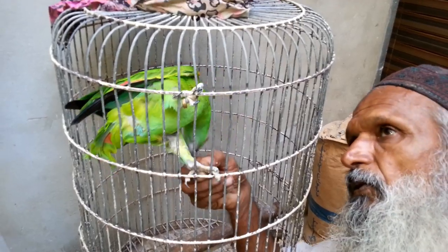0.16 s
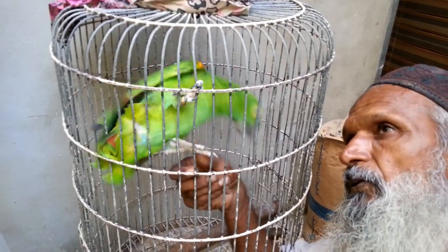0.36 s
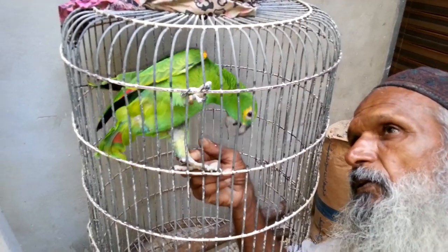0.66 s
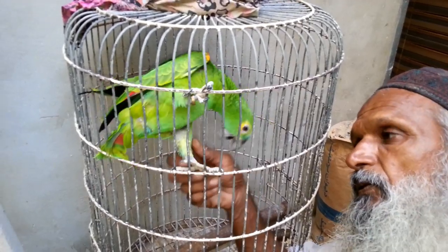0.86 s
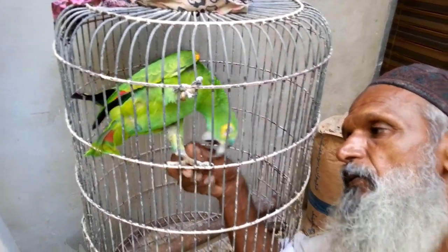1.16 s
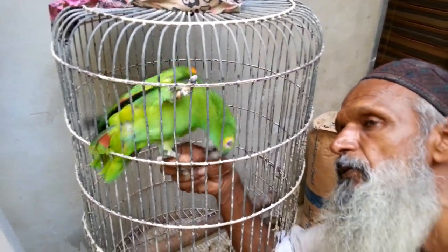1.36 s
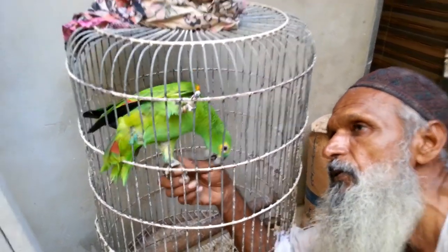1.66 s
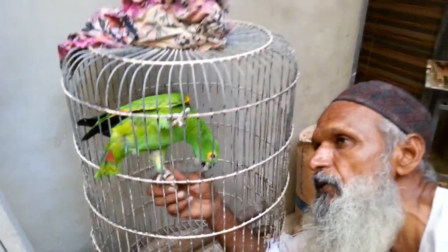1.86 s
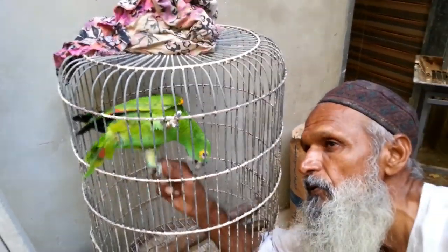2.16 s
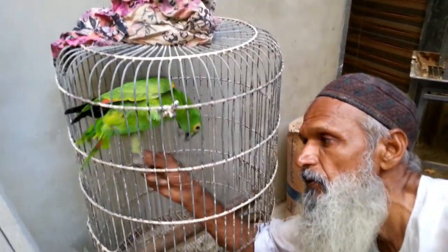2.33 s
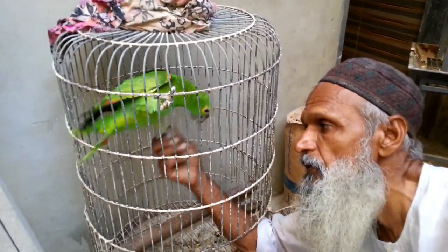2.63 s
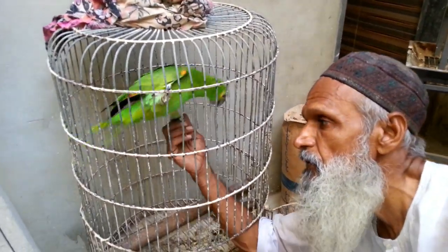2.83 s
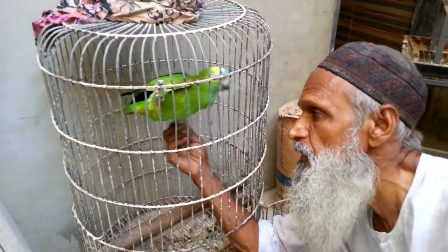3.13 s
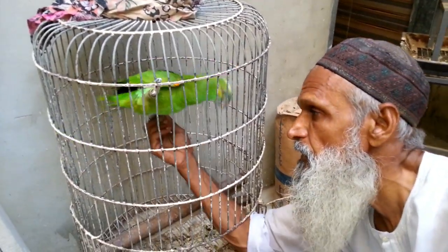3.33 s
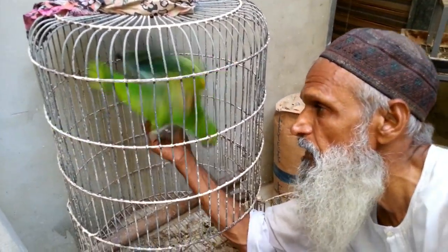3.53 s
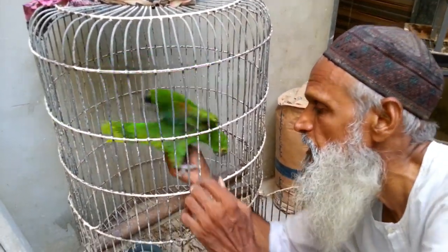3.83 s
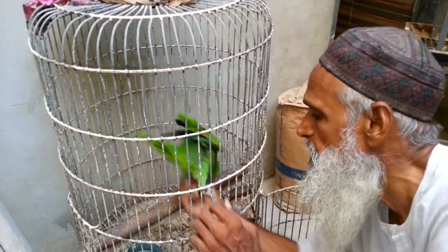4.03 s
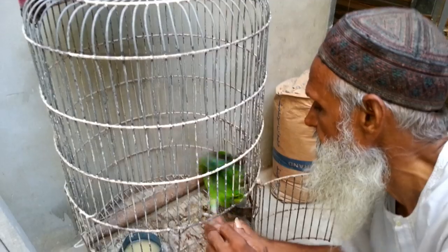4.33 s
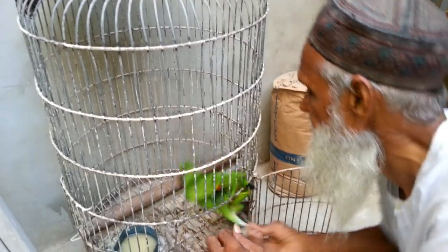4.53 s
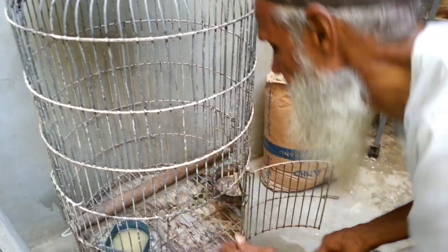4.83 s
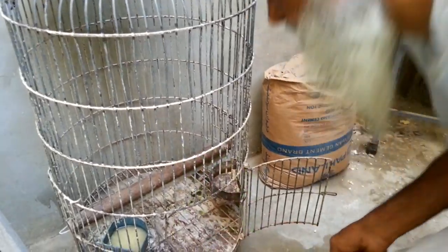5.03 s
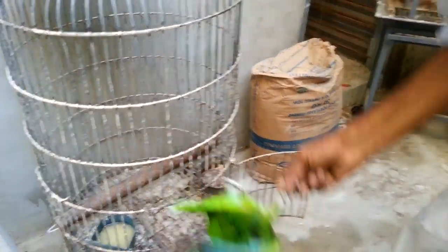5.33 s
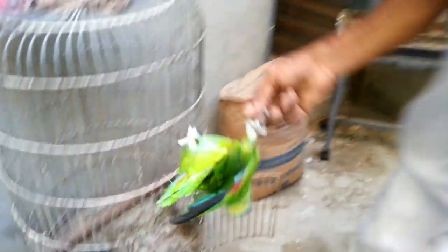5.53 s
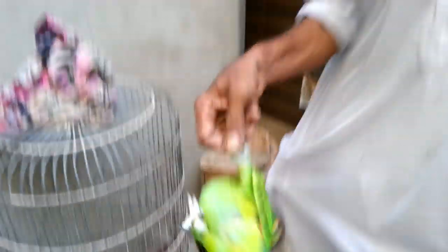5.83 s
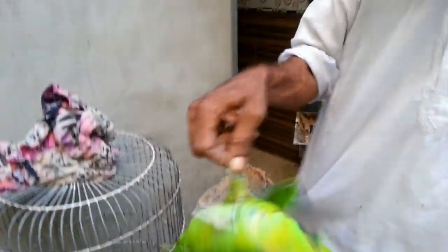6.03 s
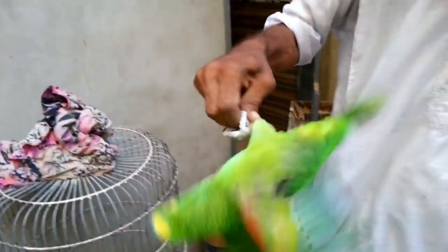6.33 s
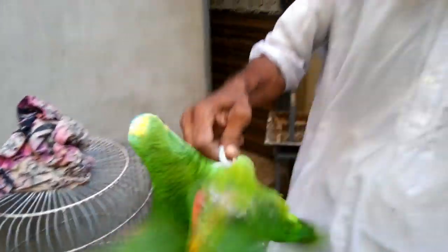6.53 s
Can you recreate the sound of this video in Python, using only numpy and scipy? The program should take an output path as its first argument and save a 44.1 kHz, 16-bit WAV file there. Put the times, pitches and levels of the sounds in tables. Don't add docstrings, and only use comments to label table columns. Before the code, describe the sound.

A parrot's feathers rustle and snap in quick wing bursts, with faint squeaks in a hard-walled yard, then one loud harsh squawk overloads the microphone.

```python
import sys
import numpy as np
from scipy import signal
from scipy.fft import rfft, irfft, next_fast_len
from scipy.io import wavfile
from scipy.ndimage import uniform_filter1d, minimum_filter1d

SR = 44100
rng = np.random.default_rng(int(sys.argv[2]) if len(sys.argv) > 2 else 0)


def to_linear_factor(level_db):
    exponent = np.asarray(level_db, float) / 20
    return 10 ** exponent


def persist_wave(psi):
    counts = np.round(np.clip(psi, -1, 1) * 32767).astype(np.int16)
    wavfile.write(sys.argv[1], SR, np.atleast_2d(counts).T)


N = 294588
CLOCK = np.arange(0, N / SR + .001, .0005)


def level(x, db):
    return x * to_linear_factor(db) / np.sqrt(np.mean(x ** 2))


def colour(x, points):
    size = next_fast_len(len(x))
    hz, db = np.transpose(points)
    log_hz = np.log(np.arange(size // 2 + 1) * SR / size + 1)
    gain = to_linear_factor(np.interp(log_hz, np.log(hz), db))
    return irfft(rfft(x, size) * gain, size)[:len(x)]


def walk(rate, size=8192):
    hold = max(int(SR / rate), 2)
    steps = np.repeat(rng.standard_normal(size // hold + 1), hold)
    return 1.167 * uniform_filter1d(uniform_filter1d(steps, hold), hold)[:size]


def band(x, hz, octaves):
    edges = np.clip(hz * 2 ** (np.array([-octaves, octaves]) / 2), 10, .45 * SR)
    return signal.sosfilt(signal.butter(2, edges, "band", fs=SR, output="sos"), x)


def add(out, s, x):
    i = int(s * SR)
    out[i:i + len(x)] += x[:N - i]


def yard_tone():
    # pitch_hz, level_db
    yard_colour = [(15, -47), (25, -8), (55, -16), (151, -32), (221, -8), (330, -17), (581, -2.5),
                   (720, -16), (802, -6.5), (917, -16), (15400, -20.5)]
    return level(colour(rng.standard_normal(N), yard_colour), -63.5)


def surge(s, db, rise, fall, hold=0., jump_db=0.):
    before = np.maximum((s - CLOCK) / max(rise, .004), 0)
    after = np.maximum((CLOCK - s - hold) / max(fall, .04), 0)
    jump = jump_db * np.clip((s - CLOCK) / .003, 0, 1)
    return to_linear_factor(2 * (db - 30 * (before + after) - jump))


def smooth_db(power):
    return np.interp(np.arange(N) / SR, CLOCK, 10 * np.log10(power))


def motion():
    # start_s, hiss_db, fall_s per 30 dB, scrape_db re hiss, wing_body_weight_db
    shakes = [(.031, -51.5, -0.28, 5.5, 3), (.156, -70, 4, -5, 2.5), (0.405, -33.5, 0.1241, 1.5, -6),
              (0.51, -39.5, 0.1, 0.5, -8.5), (.881, -61, -0.1, 9, -5), (1.338, -42.5, 0.1255, 6, 8.5),
              (1.876, -44, 0.24, -8, -8), (1.958, -47.5, .5, -9.5, -4.5), (2.174, -38.5, 0.1, -11, -4.5),
              (2.655, -54.5, 1.1, 0, 2), (1.864, -52, 0.5, 1, -5), (2.163, -51, 0.28, -1.5, 2),
              (3.208, -57, 0.07, 7, 6), (4.106, -50, 1, -7, -3), (4.936, -51, 0.6, -3.5, 0),
              (5.255, -50, -0.1, -1, -3), (5.534, -59, 0.3, -10, -4), (6.114, -55.5, 8.2, -8.5, -5),
              (3.23, -44, 0.17, 8, 7), (3.742, -32.5, 0.11, -19, -1), (4.119, -32.5, 0.69, -7.5, 2.5),
              (4.481, -41, 0.4, 4, 4.5), (4.693, -23.5, 0.19, -11, -1.5), (4.95, -35.5, 0.15, -26.5, -8),
              (5.268, -43, 0.02, -7, -1.5), (5.316, -46, -0.08, -18, -7), (5.35, -47.5, -0.43, -12, -5.5),
              (5.54, -47, 0.14, -8, -8), (5.788, -59, 0, 0, -3), (6.024, -49.5, 0.3, -11, -10)]
    # peak_s, hiss_db, rise_s per 30 dB, fall_s per 30 dB, scrape_db re hiss
    sweeps = [(0.271, -37.5, 0.18, 0.36, 4), (1.179, -33.5, 0.1, 0.165, 3.5), (1.41, -51, 0.5, -0.01, 9.5),
              (1.6, -63.5, 3, 0.5, 4), (2.76, -54, 0.26, 0.25, 5.5), (1.757, -56, 0.3, 0.2, 2),
              (2.06, -41, 0.29, 0.06, -2), (2.482, -50, 0.08, 0, -2), (2.56, -60.5, .5, 0, 0),
              (2.985, -58, 0, 0, -5), (3.071, -53.5, 0.06, 0.13, 5.5), (3.308, -46.5, 0.14, 0.13, 0),
              (3.546, -56, 0.25, 0.3, -1), (3.613, -27, 0.0756, 0.2, -9.5), (3.798, -37.5, 0.12, 0.08, -11),
              (4.31, -39.5, 0.1, 0.22, 2.5), (4.589, -31, 0.23, 0.31, -1.5), (5.075, -45, -0.5, 0.1, -9),
              (5.14, -38, 0.1, 0.15, -18), (5.897, -55, 0.32, 0.1, 0.5), (6.066, -50.5, 0.04, 0, -8),
              (6.148, -50, 0.04, 1.8, -12), (6.459, -26, 0.27, 0.18, -7), (6.602, -27, 0.02, 0.04, -21),
              (6.671, -28, 0.02, -2, -10)]
    moves = []
    for s, db, fall, scrape_db, weight_db in shakes:
        moves.append((surge(s, db, rise=0.02, fall=fall, hold=0.011, jump_db=7), scrape_db, weight_db))
    for *row, scrape_db in sweeps:
        moves.append((surge(*row), scrape_db, 0.27 * scrape_db))
    hiss = scraped = body = to_linear_factor(2 * -81)
    for power, scrape_db, weight_db in moves:
        hiss = hiss + power
        scraped = scraped + power * to_linear_factor(2 * scrape_db)
        body = body + power * to_linear_factor(2 * weight_db)
    return smooth_db(hiss), smooth_db(scraped / hiss), smooth_db(body / hiss)


def barbs(points, rate, spread_db, octaves=.5):
    out = 0
    bands = 35 * 2 ** np.arange(0, 9.5, octaves)
    inside = (bands > points[0][0] / 1.3) & (bands < points[-1][0] * 1.3)
    for hz in bands[inside]:
        flicker = to_linear_factor(spread_db * walk(min(rate, hz / 4), size=N))
        out = out + band(rng.standard_normal(N), hz, octaves) * flicker
    return level(colour(out, points), 0)


def draught(hiss_db):
    # time_s, level_db
    breeze = [(0.0, -51.5), (0.2, -54), (1.06, -63.5), (1.1, -51), (1.67, -65.5), (1.99, -53), (2.1, -65),
              (4.78, -58.5), (4.84, -65), (5.97, -67), (6.06, -56), (6.13, -60), (6.22, -57), (6.47, -37),
              (6.53, -44.5), (6.57, -32), (6.62, -57), (6.68, -26)]
    # peak_s, level_db, rise_s per 30 dB, fall_s per 30 dB
    gusts = [(.2, -45.5, 0.5, 2), (.5, -48, 1, -1), (.71, -44.5, -0.95, -0.5), (.94, -50, -0.2, 0.4),
             (1.085, -50, -0.1, 0.4), (1.2, -47, 0.16, 0.34), (1.42, -47.5, 0.5, 0.23),
             (1.71, -52.5, 0.5, 0), (1.84, -45.5, 0, 0.26), (2.03, -49, 0.96, 0), (2.29, -52, 0.15, -0.4),
             (2.37, -55.5, 0.5, 2.5), (2.67, -52, 0.2, 2), (3.26, -47.5, 0.13, 0.16),
             (3.48, -50.5, 0.3, .5), (3.64, -48, 0.2, 0.5), (3.98, -45.5, -1.6, -0.27),
             (4.14, -44, -0.23, 0.53), (4.2, -40, 0.04, -0.16), (4.75, -46, 1.26, 0.3),
             (5.269, -48.5, -0.16, .3), (5.2, -55.5, 1.5, 0.6), (5.85, -54.5, 1.46, 0.3),
             (6.244, -38.5, 0.15, 0.1), (6.454, -34.5, 0.06, -0.3), (6.68, -36, 0.71, .3)]
    # pitch_hz, level_db
    air_colour = [(40, -25), (70, -8.5), (110, -2), (150, -5), (300, -3.5), (500, -10.5), (800, -18),
                  (1500, -20.5)]
    # pitch_hz, level_db
    buffet_colour = [(10, -38), (25, -13), (50, -9), (80, -2.5), (130, -19.5), (300, -38)]
    # start_s, peak_db, pitch_hz
    thumps = [(.077, -32, 270), (0.084, -30, 260), (.092, -29.5, 250), (0.162, -38.5, 113),
              (.497, -32, 370), (.69, -40, 210), (1.076, -38, 275), (1.334, -42, 360), (1.592, -35, 320),
              (1.993, -37, 310), (3.74, -37, 230), (4.155, -22.5, 900), (4.197, -31, 500),
              (2.038, -23.5, 350), (3.26, -31.5, 390), (3.655, -27, 288), (3.989, -44.5, 88),
              (4.125, -25.5, 246), (4.151, -24, 240), (5.268, -36, 139), (6.25, -19.5, 300),
              (6.442, -20.5, 283), (6.455, -20.5, 51.5), (6.477, -23, 347), (6.56, -28, 51.1),
              (6.567, -24, 51.1), (6.58, -24, 163), (6.603, -36, 52), (6.658, -22, 51.1),
              (6.671, -31, 91.5)]
    breeze_db = np.interp(np.arange(N) / SR, *np.transpose(breeze))
    smoothed_db = uniform_filter1d(hiss_db, int(0.036 * SR))
    push_db = -58.5 + 0.54 * (smoothed_db + 45)
    gust_db = smooth_db(sum(surge(*row) for row in gusts))
    flow = np.sqrt(to_linear_factor(2 * push_db) + to_linear_factor(2 * gust_db) + to_linear_factor(2 * (breeze_db - 3.5)))
    flutter = to_linear_factor(2.55 * walk(24.987, size=N) - 1.13)
    out = flow * flutter * barbs(air_colour, 25, 2.76)
    out = out + to_linear_factor(breeze_db - 2.5) * level(colour(rng.standard_normal(N), buffet_colour), 0)
    t = np.arange(4096) / SR
    for s, db, hz in thumps:
        add(out, s, -to_linear_factor(db) * np.sin(2 * np.pi * hz * t) * np.exp(-2.6 * hz * t))
    return out


def rustle(hiss_db, scrape_db, weight_db):
    # pitch_hz, level_db
    hiss_colour = [(2500, -55), (4000, -14.5), (5500, -10.5), (6500, -3.5), (8200, 1), (9800, -2),
                   (11500, -9.5), (14000, -17), (16000, -24)]
    # pitch_hz, level_db
    scrape_colour = [(1200, -30), (2200, -3), (3000, -2.5), (4500, -0.5), (5800, -0.5), (7500, -9.5),
                     (11000, -56)]
    # pitch_hz, level_db
    body_colour = [(250, -14), (600, -2), (1200, 0), (2000, 0.5), (3000, -1.5), (5000, -17.5)]
    body_db = -52.5 + 0.66 * (hiss_db + 45) + weight_db - hiss_db
    scrape = to_linear_factor(scrape_db - 4.0) * barbs(scrape_colour, 18, 4.5, octaves=.2)
    wing = to_linear_factor(body_db) * barbs(body_colour, 30, 2.6) + scrape
    flutter_db = 1.8 * walk(140, size=N)
    return to_linear_factor(hiss_db - 2.0 + flutter_db) * (barbs(hiss_colour, 30, 2.44, octaves=.3) + wing)


def breathy_bands(rows):
    out, t = np.zeros(N), np.arange(8192) / SR
    for s, length, hz, width_hz, db in rows:
        octaves = width_hz / hz * 1.7
        shape_db = -5 * t / length - 10 * np.maximum(t - length, 0) / 0.03
        rise = np.minimum(t / (0.19 * length), 1)
        breath = band(band(rng.standard_normal(len(t)), hz, octaves), hz, octaves)
        add(out, s, level(breath, db) * to_linear_factor(shape_db) * rise)
    return out


def singing_feathers():
    # start_s, length_s, centre_hz, width_hz, level_db
    wheeze_rows = [(.03, 0.011, 3860, 900, -51), (0.235, 0.06, 3840, 200, -45.5),
                   (0.245, 0.075, 5700, 500, -41), (.24, 0.089, 2110, 400, -49),
                   (0.371, .05, 2930, 500, -46.5), (.617, 0.018, 3700, 1200, -51),
                   (0.878, .016, 3470, 300, -55), (1.104, .12, 2980, 500, -43.5),
                   (1.156, 0.083, 5730, 1000, -30.5), (1.169, 0.084, 4600, 900, -40.5),
                   (1.168, .05, 8700, 900, -36), (1.345, 0.042, 6940, 400, -49.5),
                   (1.874, .05, 9900, 700, -50), (1.958, 0.12, 7000, 500, -47),
                   (1.96, .045, 9800, 800, -45), (1.965, 0.13, 4330, 400, -51),
                   (4.36, 0.015, 4900, 400, -44), (4.497, .06, 2410, 300, -45),
                   (4.58, 0.088, 4330, 400, -47.5), (4.689, 0.064, 4750, 400, -30),
                   (4.868, 0.037, 8600, 600, -52), (4.95, 0.042, 4430, 300, -50.5),
                   (5.316, 0.037, 8400, 900, -42.5), (5.324, 0.036, 5050, 400, -49.5),
                   (5.535, 0.029, 8640, 800, -43), (6.117, .05, 8300, 1200, -55),
                   (2.46, 0.028, 3900, 450, -57.5), (2.718, 0.048, 3050, 300, -53),
                   (2.801, .015, 2000, 1200, -51), (5.891, .04, 2300, 600, -66),
                   (3.058, .03, 12500, 4000, -55), (3.208, .07, 13500, 4000, -57),
                   (3.285, .035, 12500, 4500, -50)]
    return breathy_bands(wheeze_rows)


def gasps():
    # start_s, length_s, centre_hz, width_hz, level_db
    gasp_rows = [(6.21, .035, 10000, 600, -23), (6.35, .06, 6560, 1100, -13.5),
                 (6.339, 0.067, 3640, 1260, -24.5), (6.335, 0.064, 8850, 470, -21),
                 (6.334, 0.085, 5230, 210, -21.5), (6.41, .1, 5210, 200, -30), (6.51, 0.12, 5180, 170, -41),
                 (6.315, .1, 10600, 500, -26.5), (6.205, .03, 6750, 440, -16.5),
                 (6.485, .008, 9000, 2200, -27), (4.948, 0.037, 8000, 2500, -35.5),
                 (4.385, .035, 7900, 3500, -45), (.3, .12, 2970, 1800, -46), (.182, .05, 10100, 500, -46),
                 (.156, .04, 12100, 400, -54), (.25, .06, 11000, 500, -45), (4.722, .04, 7800, 4000, -32),
                 (.28, 0.08, 5000, 1800, -49), (5.91, .02, 3000, 250, -62), (5.924, 0.019, 2020, 250, -60)]
    return breathy_bands(gasp_rows)


def ring(drive, hz, db, t60):
    pole = np.exp(2j * np.pi * hz / SR - np.log(1000) / (t60 * SR))
    tremble_db = 6 * walk(90, size=N)
    return to_linear_factor(db + tremble_db) * signal.lfilter([1], [1, -pole], drive).imag


def cage(near):
    # start_s, level_db
    claw_taps = [
        (.033, -68),
        (0.621, -71),
        (.883, -70),
        (2.653, -72),
    ]
    # pitch_hz, level_db, t60_s
    wires = [
        (1590, -1, .5),
        (2140, -2, 0.33),
        (2650, -3, .8),
        (3340, -2, .8),
        (4660, -8, .3),
    ]
    taps = np.zeros(N)
    for s, db in claw_taps:
        add(taps, s, to_linear_factor(db) * rng.standard_normal(64) / 8)
    return sum(ring(taps, *wire) for wire in wires) + ring(near, hz=5200, db=-66, t60=0.57)


def strokes():
    # start_s, peak_db, fade_s
    wing_strokes = [(0.405, -26, 0.089), (0.5154, -19, 0.099), (1.7374, -29, 0.13), (1.864, -28, 0.19),
                    (1.96, -19.5, 0.14), (2.175, -19, 0.12), (2.848, -24.5, 0.097), (3.0607, -27, 0.1),
                    (3.286, -18.5, 0.11), (3.5897, -34, 0.1), (3.654, -7, 0.064), (3.7416, -13.5, 0.096),
                    (4.1185, -25, 0.037), (4.15, -13, 0.07), (4.36, -33, 0.1), (4.575, -11, 0.091),
                    (4.604, -5.5, 0.11), (4.6922, 0, 0.21), (4.9526, -26.5, 0.11), (5.134, -21, 0.13),
                    (5.3173, -25, 0.12), (5.543, -29, 0.086), (6.2113, 11, 0.077)]
    # start_s, peak_db
    scuffs = [(0.033, -39), (0.621, -31), (0.8835, -40), (1.3345, -28), (3.2306, -28), (5.2679, -19.5),
              (6.489, -18), (6.5654, -6.5), (6.598, -20), (6.6512, -12), (6.6684, -6.5)]
    # start_s, peak_db, centre_hz
    ticks = [(2.0352, -25.5, 1690), (3.6574, -12.5, 9650), (3.7419, -43, 9570), (3.771, -23, 8050),
             (4.1974, -15, 8940), (4.736, -13, 8900), (1.336, -25, 3500), (3.7436, -23, 8000),
             (3.751, -25, 8000), (4.1185, -33, 7900), (4.448, -41, 6000), (5.124, -34, 9000),
             (6.0242, -35.5, 7000), (6.146, -37, 8000), (6.546, -28, 10000), (4.576, -27, 6000),
             (.0318, -38, 5000), (6.49, -18, 9500), (6.568, -22, 2500)]
    out, t = np.zeros(N), np.arange(8192) / SR
    rows = [row + (0.21,) for row in wing_strokes] + [row + (0.079, 0.54) for row in scuffs]
    for s, db, fade, duller in rows:
        shape = (1 - np.exp(-t / 0.0028)) * np.exp(-np.log(1000) * t / max(fade, .01))
        width = 2.0 + np.clip(duller, 0, 2)
        crack = band(rng.standard_normal(len(t)), 8500 / 2 ** duller, width)
        add(out, s - .002, level(crack, db - 18.5) * shape)
    for s, db, hz in ticks:
        snap = band(np.exp(-t[:512] / .00006), hz, 2.3)
        add(out, s, to_linear_factor(db) * snap / np.abs(snap).max())
    return out


def voice(notes, octave_db, octave_db_per_khz, waver, rate, swell):
    out = np.zeros(N)
    for s, length, hz0, hz1, db in notes:
        u = np.linspace(0, 1, int(length * SR))
        pitch, size = walk(rate), walk(300)
        hz = (hz0 + (hz1 - hz0) * u) * (1 + waver * pitch[:len(u)])
        phase = 2 * np.pi * np.cumsum(hz) / SR
        second_db = octave_db + octave_db_per_khz * (hz0 - 4000) / 1000
        third = to_linear_factor(-7) * np.sin(3 * phase) * (hz0 < 5300)
        tone = np.sin(phase) + to_linear_factor(second_db) * (np.sin(2 * phase) + third)
        edge = np.minimum(np.minimum(u / swell, (1 - u) * length / 0.0015), 1)
        hoarse = to_linear_factor(db + 4 * size[:len(u)])
        add(out, s, hoarse * edge * tone)
    return out


def chirps():
    # start_s, length_s, start_hz, end_hz, level_db
    chirp_notes = [
        (.154, 0.02, 6100, 6040, -35),
        (.178, 0.012, 5250, 4950, -38),
        (.19, 0.043, 4900, 4750, -50.5),
        (.196, 0.014, 3720, 3610, -48),
        (.25, 0.023, 2740, 3710, -48.5),
        (.266, 0.011, 3760, 3980, -35),
        (.274, 0.014, 3890, 3430, -39),
    ]
    return voice(chirp_notes, 9, -7, waver=.013, rate=900, swell=.25)


def rasps():
    # start_s, length_s, start_hz, end_hz, level_db
    rasp_notes = [
        (1.075, 0.03, 3920, 3820, -60),
        (1.175, 0.041, 5070, 4920, -36.5),
        (1.65, 0.011, 4140, 3870, -51),
        (1.87, 0.046, 4300, 4250, -52.5),
        (2.47, 0.015, 3900, 3880, -60),
        (2.76, 0.04, 3400, 3300, -55.5),
        (3.23, 0.04, 5320, 5490, -42),
        (4.575, 0.052, 6650, 6500, -36),
    ]
    # start_s, length_s, start_hz, end_hz, level_db
    buzz_notes = [
        (.238, 0.078, 2063, 2420, -48),
        (.405, 0.035, 4000, 3720, -41),
        (1.168, 0.038, 4300, 4200, -40),
        (1.345, 0.04, 3440, 3410, -49.5),
        (1.865, 0.08, 3420, 3390, -54),
        (1.96, 0.1, 3520, 3420, -53),
    ]
    rough = dict(waver=.07, rate=1400, swell=.3)
    return voice(rasp_notes, -15, -1.5, **rough) + voice(buzz_notes, 1, 5.7, **rough)


def croaks():
    # start_s, length_s, start_hz, end_hz, level_db
    croak_notes = [
        (1.145, 0.038, 3400, 3330, -45),
        (1.16, 0.0513, 2928, 2830, -43.5),
        (6.261, 0.026, 3727, 4054, -14),
        (6.331, 0.03, 3230, 2980, -24.5),
        (6.392, 0.012, 3450, 3700, -26),
        (6.358, 0.043, 2988, 2950, -26.5),
        (6.348, 0.042, 3290, 3577, -20.5),
        (6.376, 0.0259, 3550, 3300, -23),
    ]
    return voice(croak_notes, -3, -16.5, waver=.022, rate=1100, swell=.15)


def squawk():
    # start_s, length_s, start_hz, end_hz, level_db
    squawk_notes = [(6.198, 0.0089, 3580, 3400, -23), (6.207, 0.011, 3384, 3330, -18),
                    (6.222, 0.019, 5050, 4950, -24), (6.208, 0.015, 5340, 4740, -18),
                    (6.218, 0.026, 4330, 4144, -6.5), (6.243, .02, 4160, 3750, -6.5),
                    (6.275, 0.012, 4650, 5030, -12), (6.285, 0.0143, 5030, 5130, -8),
                    (6.305, .011, 5046, 5105, -4), (6.318, 0.0056, 5180, 5200, -14),
                    (6.325, 0.0093, 5170, 5260, -1.5)]
    # start_s, length_s, start_hz, end_hz, level_db
    whistle_notes = [
        (6.212, 0.01, 1090, 1047, -28),
        (6.29, 0.0454, 1104, 1330, -38.5),
    ]
    clear = dict(waver=.008, rate=1000, swell=.3)
    return voice(squawk_notes, -2.2, -9, **clear) + voice(whistle_notes, -7, 0, **clear)


def walls(x):
    # pitch_hz, t60_s, level_db
    echo_bands = [
        (1640, 0.35, -2.5),
        (5200, 0.39, -3),
        (11100, 0.24, 1),
    ]
    t = np.arange(SR // 2) / SR
    echo = 0
    for hz, t60, db in echo_bands:
        echo = echo + to_linear_factor(db - 60 * t / t60) * level(band(rng.standard_normal(len(t)), hz, 1.3), 0)
    echo = echo * np.clip((t - .002) / 0.0024, 0, 1)
    return to_linear_factor(-3) * signal.fftconvolve(x, echo / np.sqrt(np.sum(echo ** 2)))[:N]


def scene():
    # pitch_hz, level_db
    near_colour = [(500, -9), (9000, 1), (10500, 0), (12000, -10.5), (13500, -23), (16000, -22)]
    chirping = chirps()
    near = colour(chirping + rasps() + squawk() + croaks() + strokes(), near_colour)
    direct = near - 0.099 * colour(chirping, near_colour)
    hiss_db, scrape_db, weight_db = motion()
    feathers = rustle(hiss_db, scrape_db, weight_db) + singing_feathers()
    background = yard_tone() + draught(hiss_db)
    return (background + feathers + gasps() + cage(near) + direct + walls(near))[None]


def low_pass(x):
    return signal.sosfilt(signal.butter(12, 15570, fs=SR, output="sos"), x)


def record(dry):
    peak = uniform_filter1d(-minimum_filter1d(-np.abs(dry), size=66), size=44)
    held = dry * np.minimum(1, .98 / (peak + 1e-9)) ** .68
    return low_pass(np.clip(held, -1, 1))


dry = scene()
out = record(dry)
persist_wave(out)
```